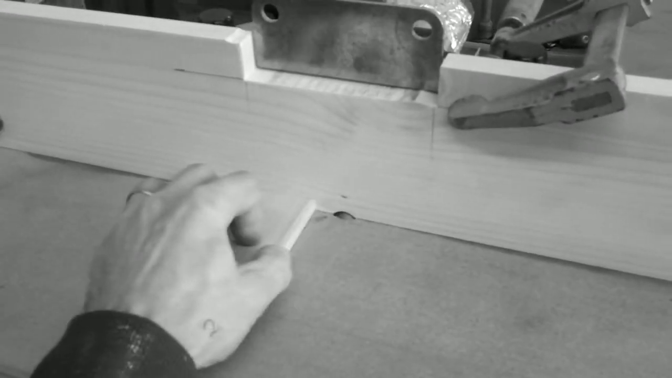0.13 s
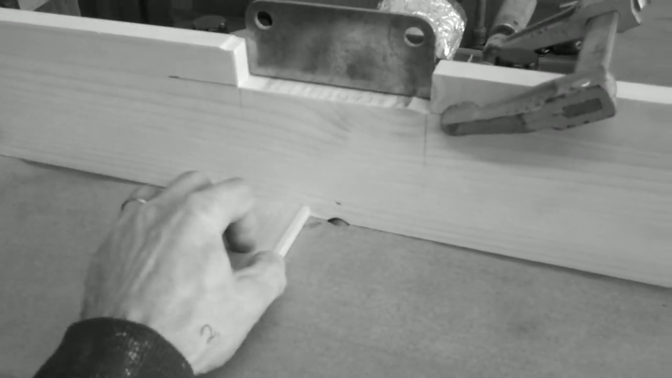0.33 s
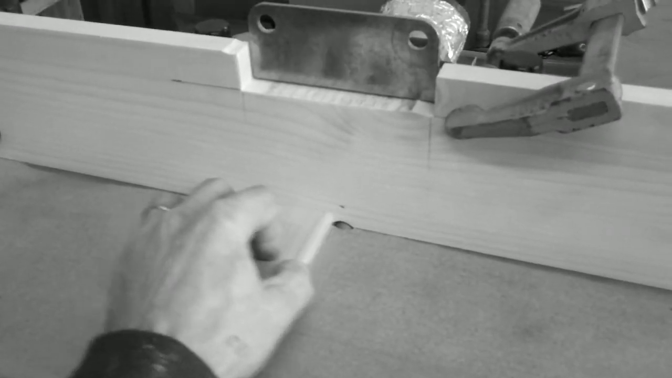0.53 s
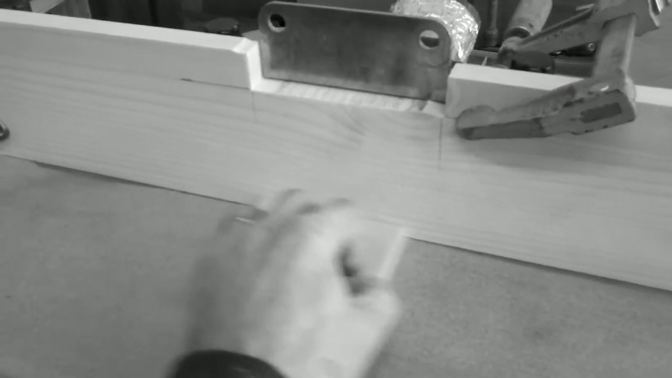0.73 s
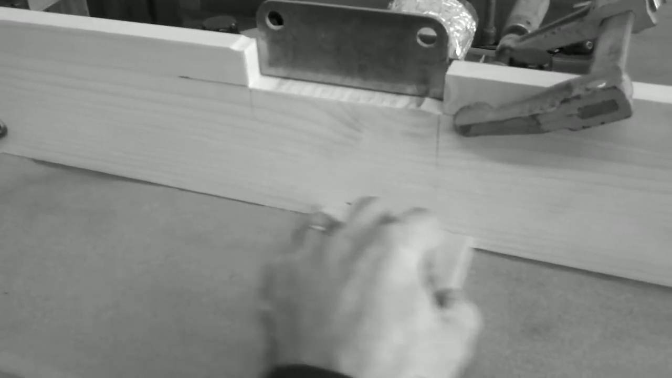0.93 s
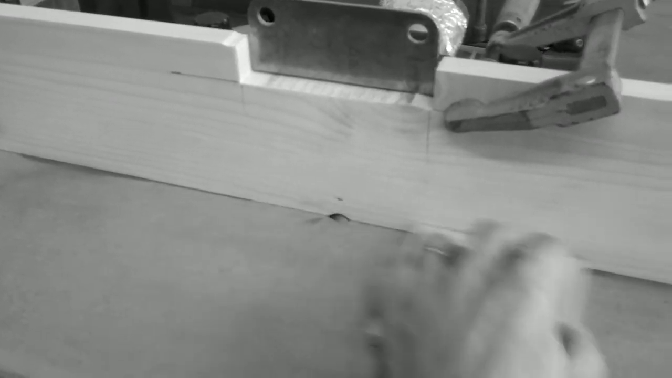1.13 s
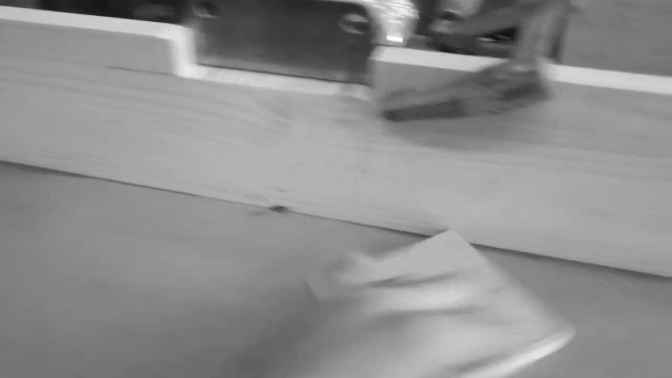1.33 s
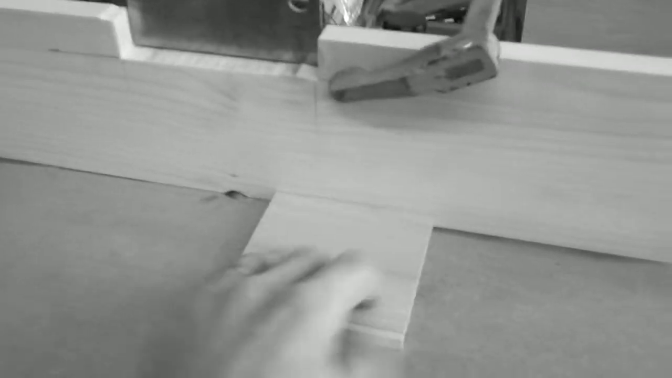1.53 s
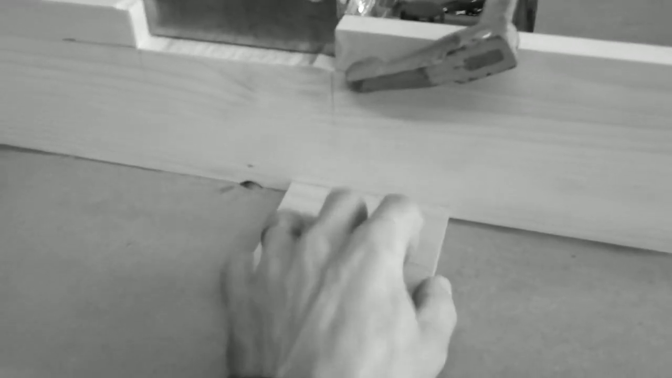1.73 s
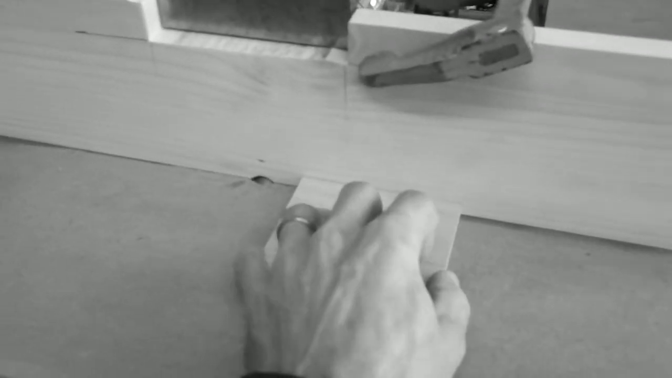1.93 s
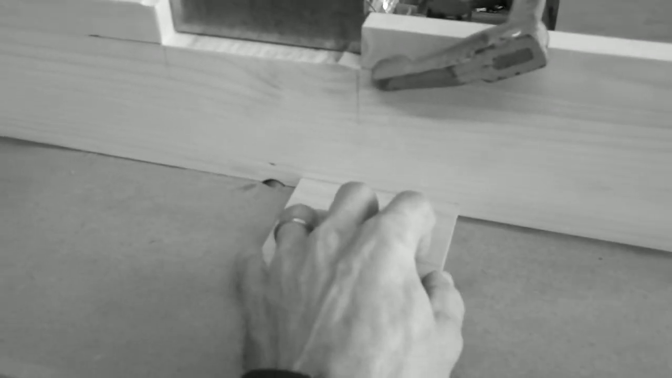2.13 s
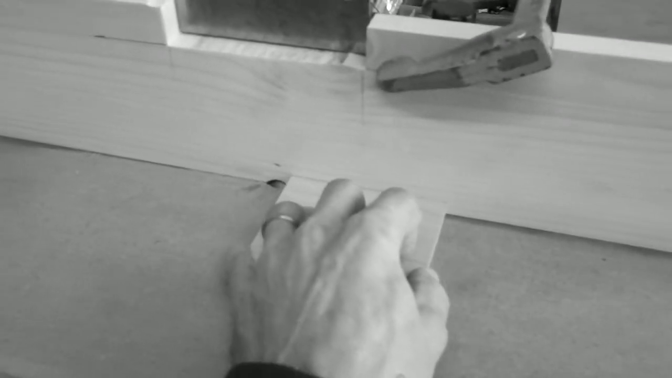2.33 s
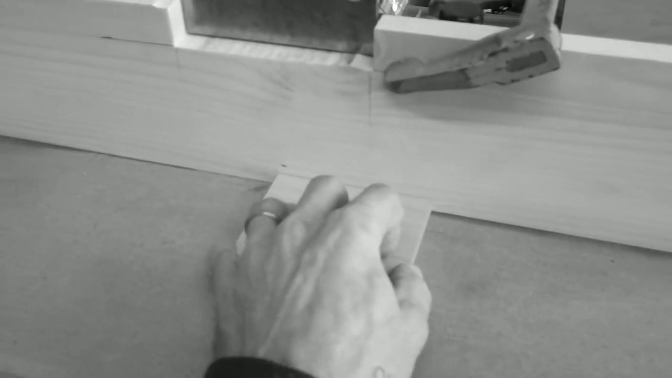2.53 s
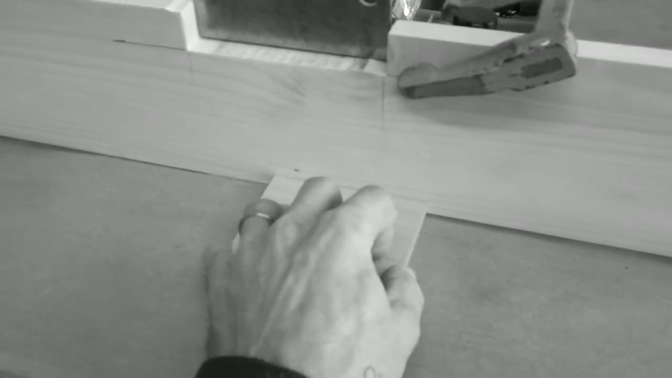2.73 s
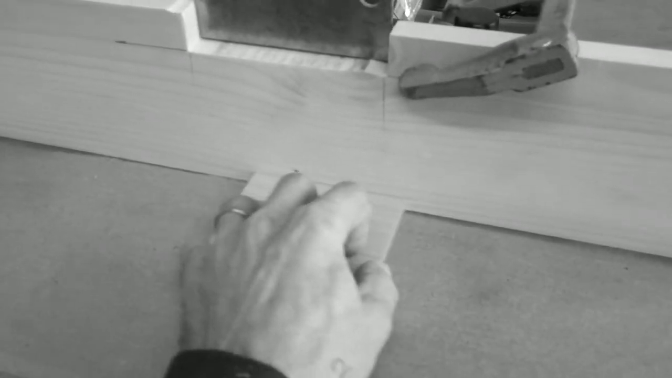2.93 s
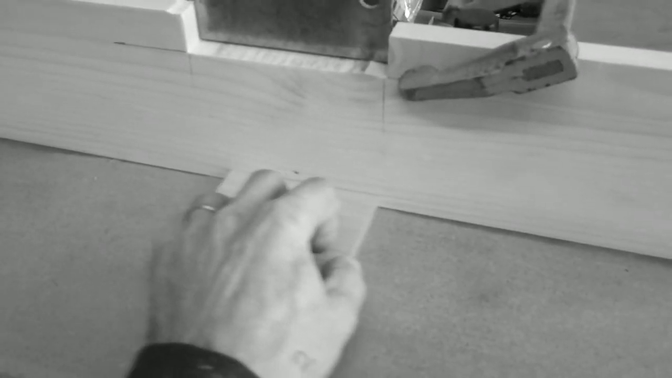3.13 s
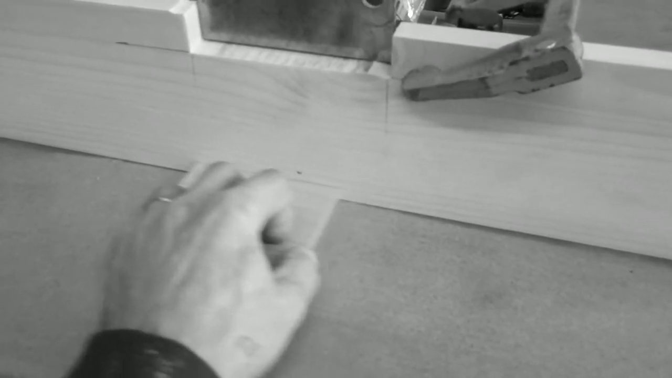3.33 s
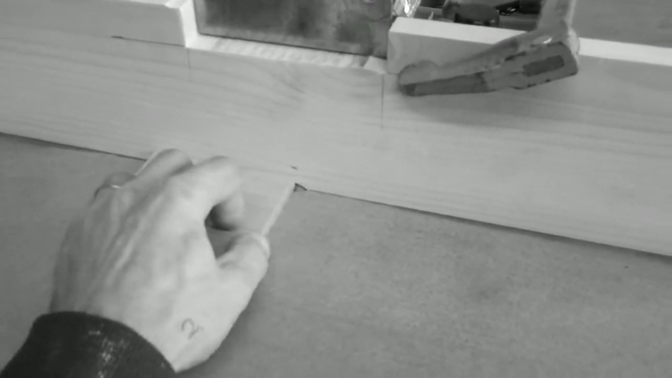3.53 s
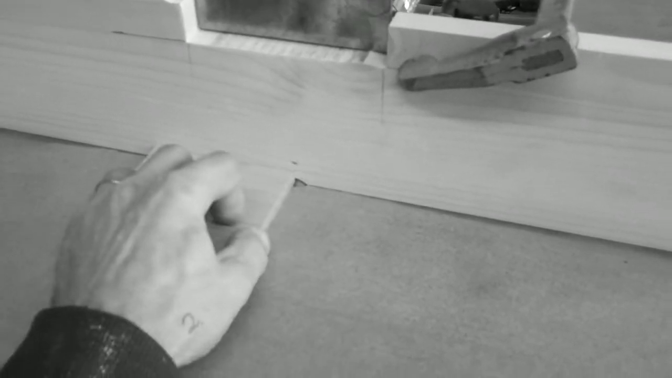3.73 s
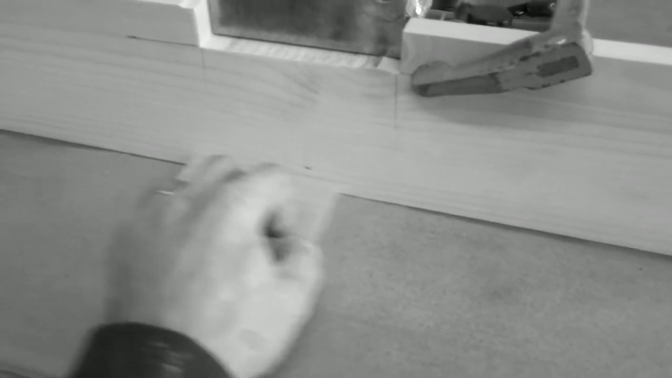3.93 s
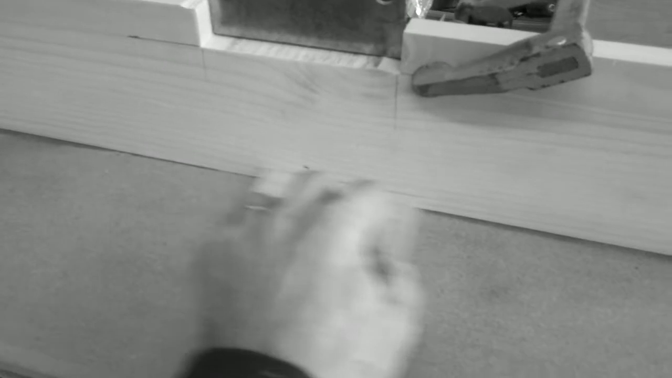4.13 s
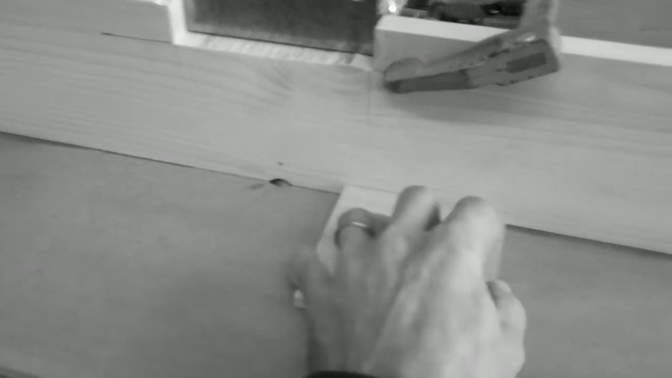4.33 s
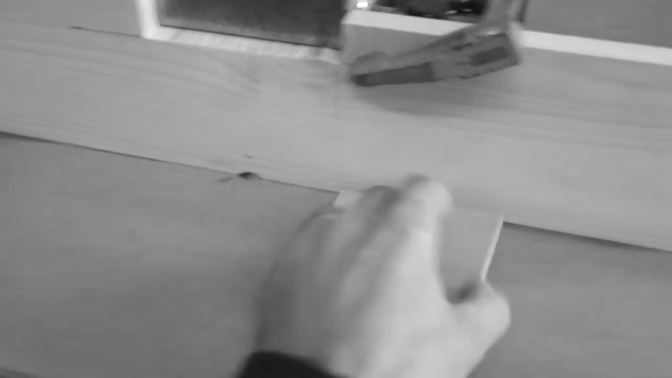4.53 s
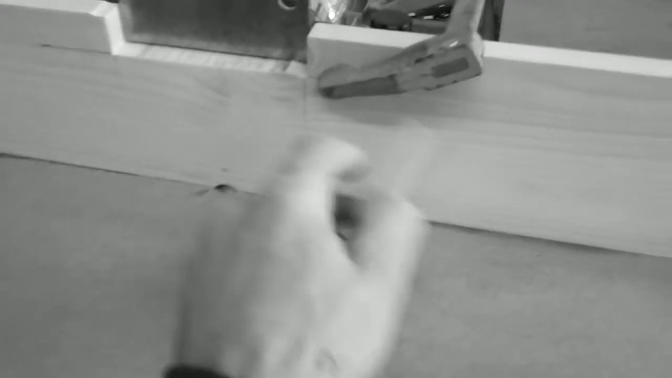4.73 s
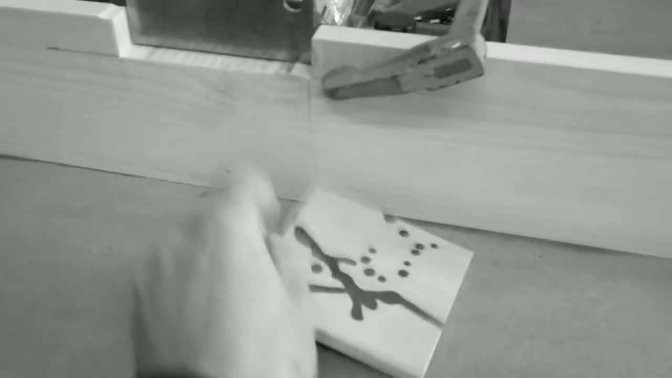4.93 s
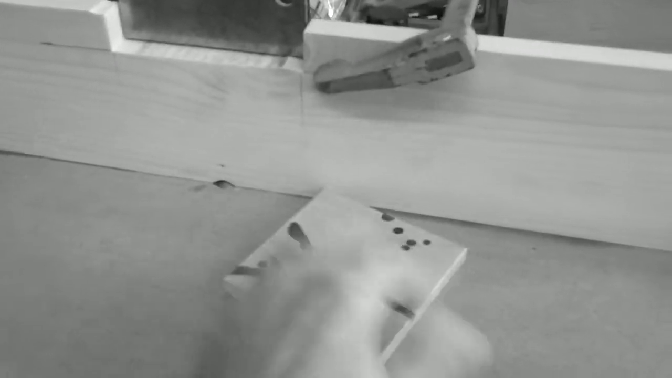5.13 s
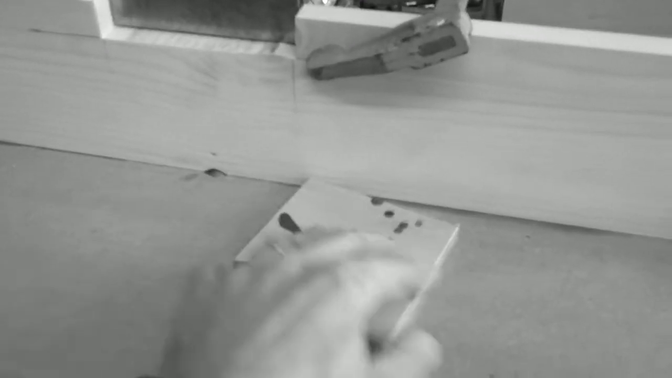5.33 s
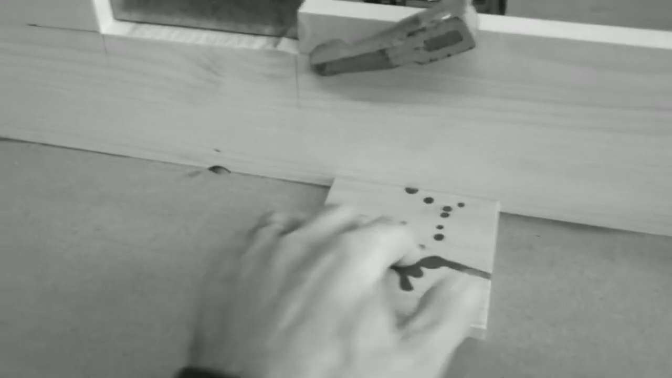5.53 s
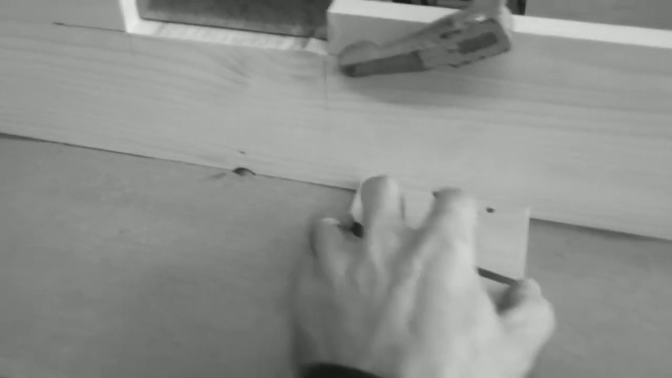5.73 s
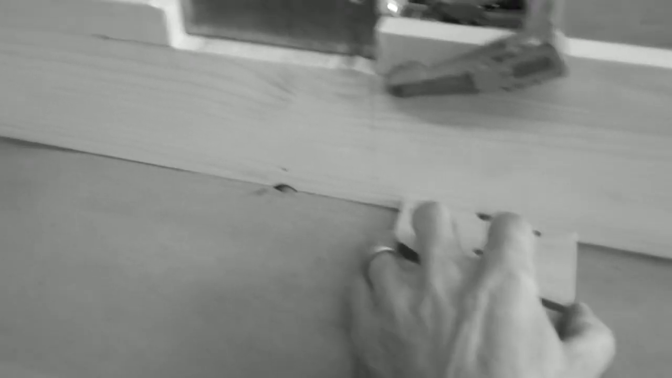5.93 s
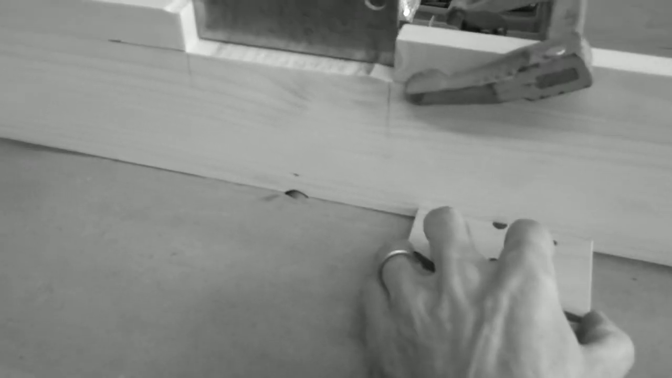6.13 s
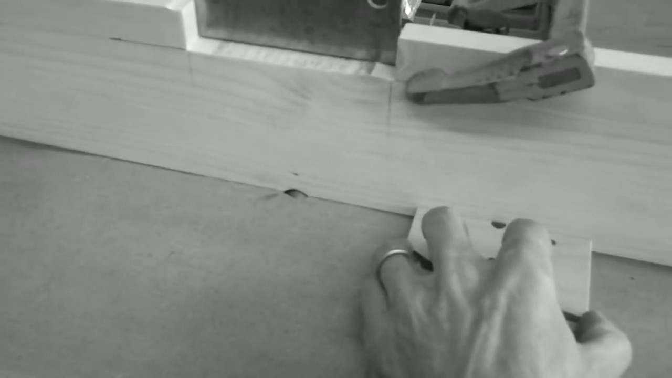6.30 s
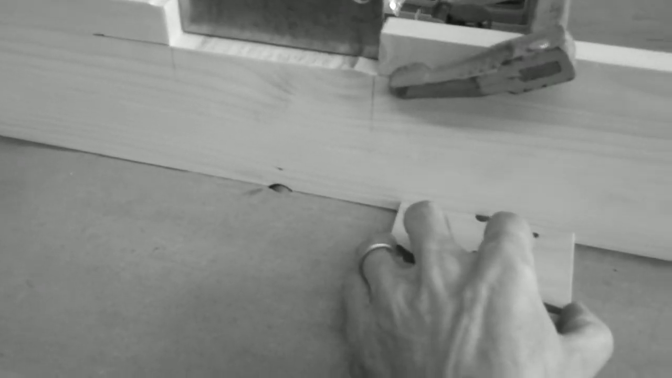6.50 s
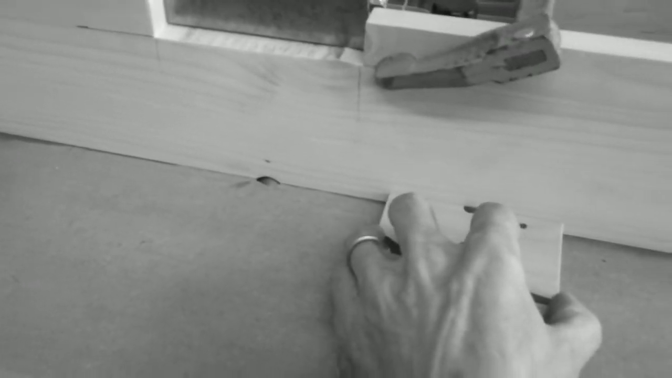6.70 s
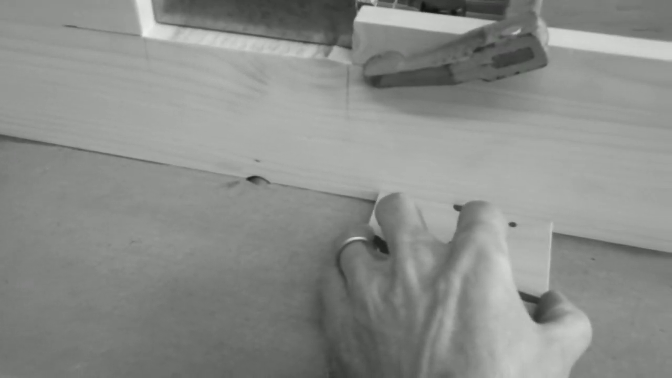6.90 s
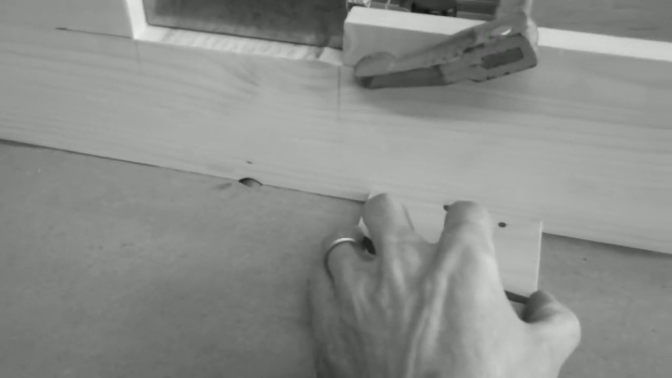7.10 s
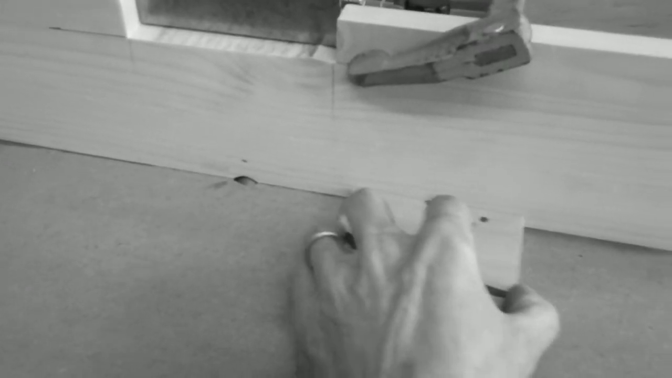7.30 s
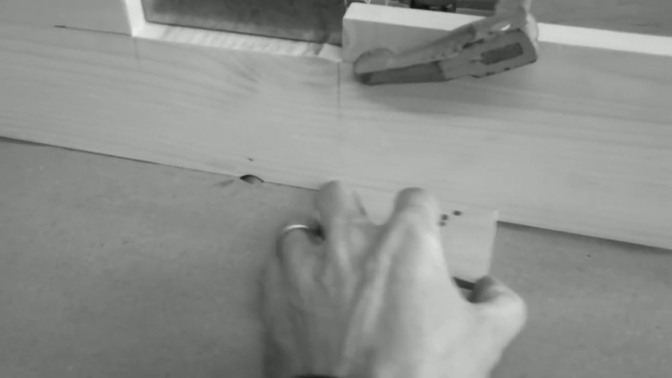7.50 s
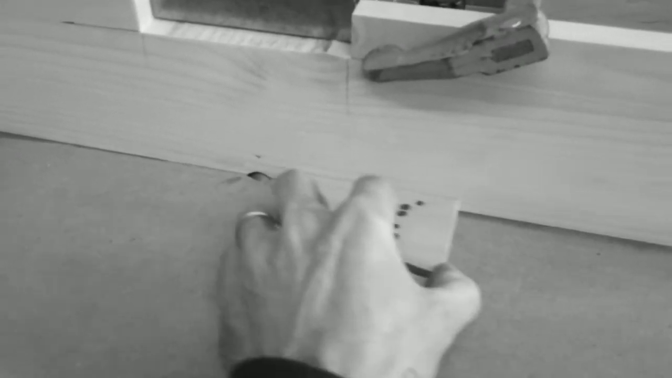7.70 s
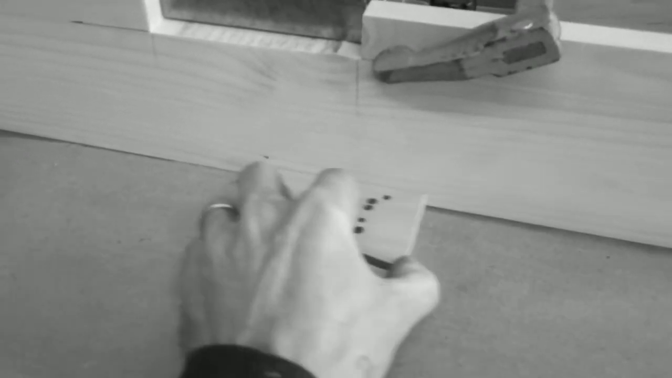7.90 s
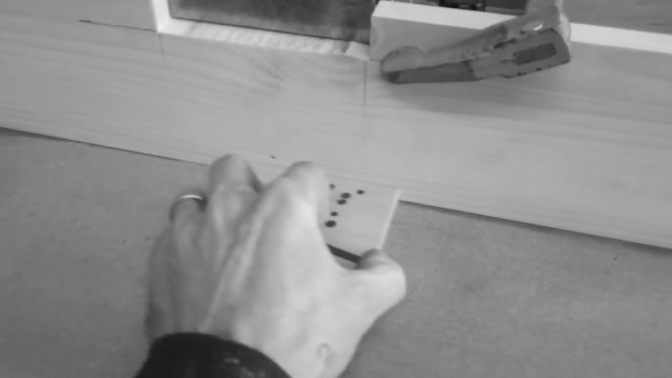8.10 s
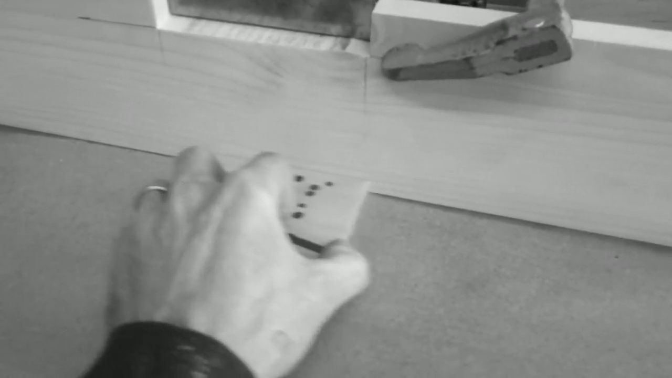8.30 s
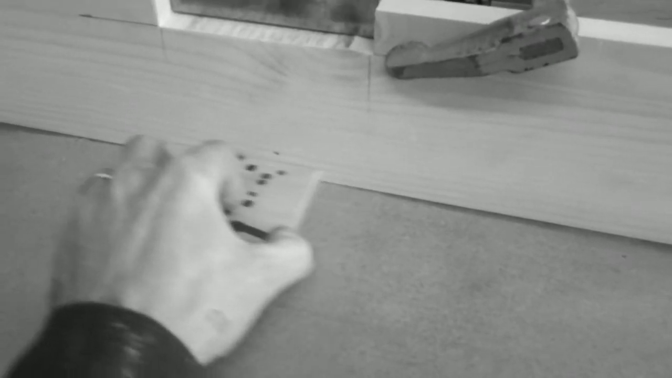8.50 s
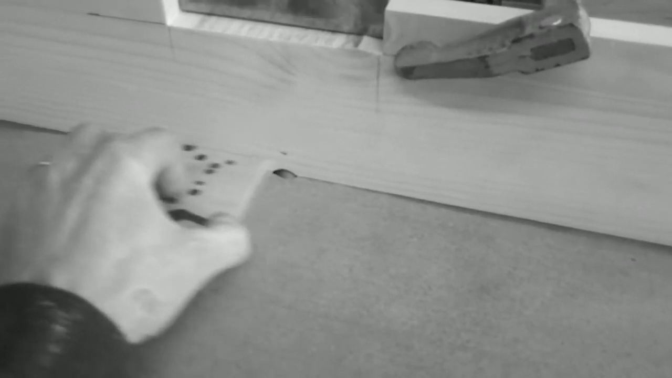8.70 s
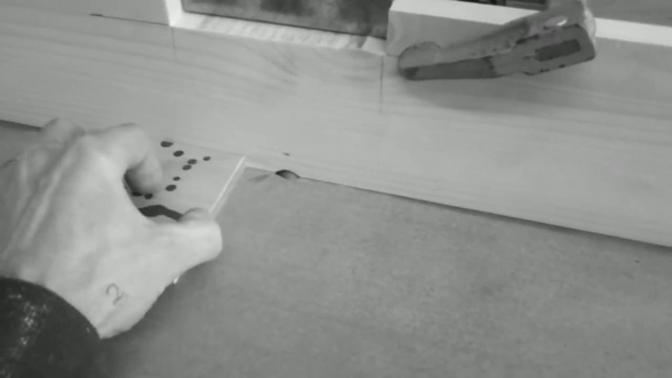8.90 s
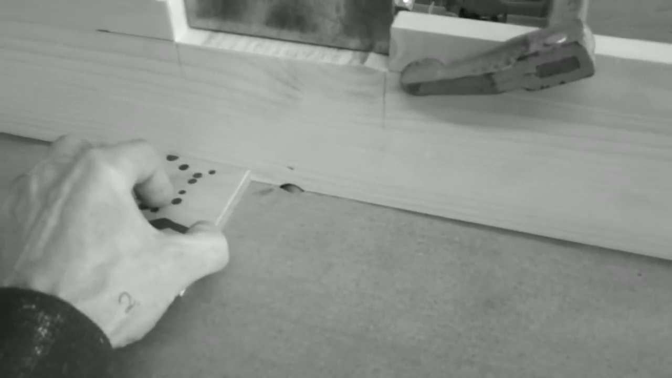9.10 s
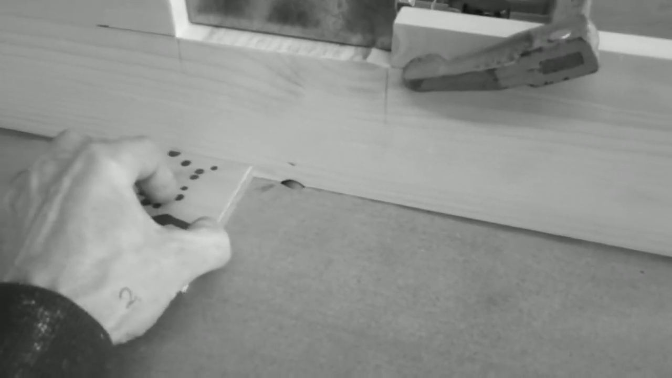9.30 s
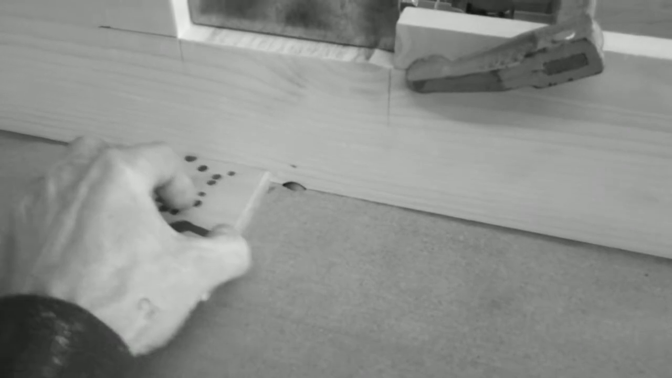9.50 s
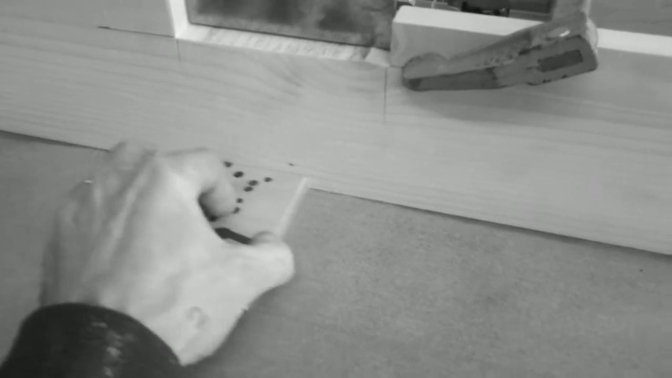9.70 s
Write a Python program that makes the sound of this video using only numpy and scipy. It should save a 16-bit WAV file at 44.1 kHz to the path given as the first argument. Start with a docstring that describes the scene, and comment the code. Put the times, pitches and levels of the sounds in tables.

```python
"""Table router cutting thin wooden tiles

A table router runs at about 207 turns a second in a small workshop while thin wooden tiles are fed along the fence.
Cooling air is shaped noise that rushes; the shaft hums and the bearings whine as tones tied to the spindle.
The two-flute bit buzzes and rasps whenever it bites, and an overtone squeals in the deepest cut.
Between passes a tile is slid, dropped and slapped down: knocks and grit that ring its wooden modes.
Each loud knock ducks the recorder, which recovers slowly."""
import sys
import numpy as np
from scipy import signal
from scipy.fft import rfft, irfft, next_fast_len
from scipy.io import wavfile

SR = 44100
rng = np.random.default_rng(int(sys.argv[2]) if len(sys.argv) > 2 else 0)


def to_wav(s):
    """Save 16-bit WAV."""
    ch = np.atleast_2d(s).T  # columns
    pcm = np.round(np.clip(ch, -1, 1) * 32767)  # PCM
    wavfile.write(sys.argv[1], SR, pcm.astype(np.int16))


N = 429975
TIME = np.arange(N) / SR  # seconds
BINS = np.fft.rfftfreq(2 * next_fast_len(N // 2 + 1, True), 1 / SR)  # Hz
WAVER = 0.09  # unsteadiness of the bit's tones, in size and in phase (radians)

# the strong tones of the cut change balance as the tile moves across:
# multiple [of the turning rate], gained_db [dB from entry to exit]
CUT_SHIFT = [(4, -1), (6, -8.5), (10, 4)]


def gain_of(db):
    """Turns decibels into a gain."""
    return 10 ** (np.asarray(db) / 20)


def evened(x):
    """Scales a sound to an rms of 1."""
    return x / np.sqrt(np.mean(x ** 2) + 1e-20)


def read(points, hz):
    """Reads a spectrum whose points are joined by straight lines on a log pitch axis."""
    point_hz, value = np.transpose(points)
    return np.interp(np.log(hz + 1), np.log(point_hz + 1), value)


def curves(rows):
    """Joins each column of a timed table by straight lines, sample by sample."""
    s, *columns = np.transpose(rows)
    return [np.interp(TIME, s, column) for column in columns]


def add(mix, s, sound):
    """Mixes a sound in at time s."""
    part = mix[round(s * SR):][:len(sound)]
    part += sound[:len(part)]


def drift(rate):
    """Slow random wander around 0, heading for a new value rate times a second."""
    slow = np.interp(TIME[::32] * rate, np.arange(1024), rng.standard_normal(1024))
    return np.repeat(slow.astype(np.float32), 32)[:N]  # held for 32 samples at a time


def coloured(x, db):
    """Filters x by a dB value for each of the BINS."""
    spectrum = rfft(x, 2 * len(BINS) - 2)
    return irfft(spectrum * gain_of(db))[:N]


def line(turns, multiple, waver):
    """One tone of rms about 1, locked to the spindle and wavering in size and phase."""
    cycles = multiple * turns + rng.random()
    within_cycle = (cycles - np.floor(cycles)).astype(np.float32)
    angle = 2 * np.pi * within_cycle + waver * drift(14)
    size = 2 ** 0.5 * (1 + waver * drift(22))
    return size * np.sin(angle)


def resonate(x, hz, width):
    """A resonance that follows the curve hz: shift it down to 0 Hz, smooth, shift back; gain 1."""
    turn = np.exp(2j * np.pi * np.cumsum(hz) / SR)
    r = np.exp(-np.pi * width / SR)
    smoothed = signal.lfilter([1 - r], [1, -r], x / turn)
    return 2 * (turn * smoothed).real


def room(x, near_db=14, near_s=0.0029):
    """Dense reflections: strong early ones off fence and table, then the workshop's short tail."""
    # time for the echoes to die away by 60 dB: pitch_hz [Hz], t60_s [s]
    room_decay = [(200, 0.23), (1200, 0.3), (4000, 0.19), (12000, 0.022)]
    t = np.arange(SR // 2) / SR
    early_boost = 1 + gain_of(near_db) * np.exp(-t / near_s)
    taps = rng.standard_normal(len(t)) * (t > 0.002) * early_boost
    hz, at, z = signal.stft(taps, SR, nperseg=128)
    fade = gain_of(-60 * at / read(room_decay, hz)[:, None])  # each pitch dies at its own pace
    tail = signal.istft(z * fade, SR, nperseg=128)[1]
    return signal.oaconvolve(x, tail / np.linalg.norm(tail))[:N]


def air(turns, level_db=-27, ripple_db=-0.5, throb=0.082, mains=0.07, flutter_db=0.96):
    """Fan noise in the housing, throbbing with each turn and with the mains-fed torque."""
    # basic colour of the rush: pitch_hz [Hz], relative_db [dB per Hz]
    air_colour = [(30, -39), (70, -26.5), (160, -16), (300, -11.5), (450, -6), (900, 0), (1500, 0),
                  (2100, 1.5), (2600, -6), (3300, -9.5), (4300, -22.5), (9300, -21), (11500, -29.5),
                  (15500, -22.5)]
    # cavities of housing and table that colour the air: pitch_hz [Hz], width_hz [Hz], boost_db [dB]
    cavities = [(389, 132, 6.5), (515, 34, -4), (1100, 250, 0), (1250, 33, -7), (6920, 580, 5),
                (9700, 210, 2.5)]
    # slow changes of the rush: time_s [s], change_db [dB]
    air_level = [(0, -1), (.85, 1), (2.1, 0.2), (4.8, 0.8), (7, 0), (9.4, 1.5), (9.75, 0)]

    shape_db = read(air_colour, BINS)
    for hz, width, db in cavities:
        shape_db = shape_db + db / (1 + (2 * (BINS - hz) / width) ** 2)
    # standing waves ripple the spectrum
    standing = np.interp(BINS, np.arange(0, 23000, 28), rng.standard_normal(822))
    torque = np.cos(2 * np.pi * 120 * TIME)
    pulsing = 1 + throb * np.cos(2 * np.pi * turns) + mains * torque
    rush = coloured(rng.standard_normal(N) * pulsing, shape_db + ripple_db * standing)
    loudness_db = level_db + curves(air_level)[0] + flutter_db * drift(25)
    return gain_of(loudness_db) * evened(rush)


def motor(turns, strain, hum_waver=0.033, shaft_waver=0.15, bearing_waver=0.17,
          lines_db=-0.5, shaft_db=-2, whine_db=0.45, loaded_db=-4.5, fizz_db=-54):
    """Shaft and bearing tones, all tied to the spindle, with a thicket of faint high overtones."""
    # tones of the motor; whole multiples are the shaft, the others bearings and their sidebands:
    # multiple [of the turning rate], level_db [dB, before the adjustments below]
    motor_lines = [(1, -32), (2, -34), (3, -46.5), (3.62, -31), (5, -41), (6, -47), (7.24, -35), (8, -42),
                   (8.24, -38), (9, -45), (10, -42), (10.86, -35.5), (12, -42), (14, -50), (14.26, -42),
                   (14.48, -49), (14.84, -40.5), (15, -44), (15.14, -41.5), (15.42, -35), (16, -53),
                   (16.58, -45), (17, -58), (17.15, -49.5), (18, -47), (18.1, -52), (18.32, -61),
                   (32.59, -61), (33.47, -60), (37.87, -57), (40, -59), (43.45, -61), (47.07, -56)]
    # the shaft's hum as hand and microphone move: time_s [s], change_db [dB]
    hum_level = [(0, -1), (.8, 3), (1.6, -1.5), (3.1, 2.5), (3.7, 1), (4.05, 3.5), (4.8, -5), (5.8, .5),
                 (7.5, -1.5), (8.35, 2), (8.85, 0.5), (9.6, 2.5)]
    # the hum's octave: time_s [s], change_db [dB]
    octave_level = [(0, -2.5), (.35, 2.5), (.75, -4), (2.3, -1), (2.85, 3), (3.4, -4.5), (3.75, 1), (4, -6),
                    (4.25, 0.5), (4.55, -3), (8.299, 2.5), (8.8, -0.5), (9.52, 5), (9.68, -9)]
    # the two low bearing tones: time_s [s], change_db [dB]
    low_whine_level = [(0, -6.5), (.4, -4), (1.1, 0), (3.1, -1.5), (4.6, .5), (6.1, .5), (8.4, -.5),
                       (9.6, -2)]

    hum_gains = [gain_of(curves(level)[0]) for level in (hum_level, octave_level)]
    low_whine = gain_of(curves(low_whine_level)[0])
    high_whine = gain_of(whine_db + loaded_db * strain)  # weakens as the cut nears full load
    out = np.zeros(N)
    for multiple, db in motor_lines:
        k = round(multiple)
        if abs(multiple - k) > 0.04:  # a bearing tone
            whine = low_whine if multiple < 8 else high_whine
            tone = whine * line(turns, multiple, bearing_waver)
        else:  # a shaft tone
            shaft_gain = hum_gains[k - 1] if k <= 2 else gain_of(shaft_db)
            tone = shaft_gain * line(turns, k, hum_waver if k == 1 else shaft_waver)
        out += gain_of(db + lines_db) * tone
    high = rng.uniform(32, 70, size=18)
    fizz = sum(line(turns, k, bearing_waver) / float(k) for k in high)
    return out + gain_of(fizz_db) * evened(fizz)


def ring(centre_hz, octaves):
    """The tile's modes, weighted by where and how hard it is struck; peak 1."""
    # modes of a tile on the table: pitch_hz [Hz], relative_db [dB], t60_s [s to fall by 60 dB]
    tile_modes = [(628, 4, 0.0074), (925, 6.5, 0.011), (1293, 4, 0.01), (1712, 3, 0.0096),
                  (2183, 10, 0.0043), (2931, -2.5, 0.018), (3498, -0.5, 0.011), (4380, -8, 0.0081),
                  (5240, -1, 0.0022), (5790, -6.5, 0.012), (6460, -6, 0.0092), (7910, 1.5, 0.0077),
                  (10350, -3.5, 0.0059), (13400, 3, 0.0027)]
    t = np.arange(SR // 10) / SR
    out = np.zeros(len(t))
    for k, (hz, db, t60) in enumerate(tile_modes):
        octaves_off = np.log2(hz / centre_hz)
        weight = 1 / (1 + (octaves_off / octaves) ** 2) ** 2.12
        sign = (-1) ** k  # neighbouring modes start in opposite directions
        out += sign * weight * gain_of(db - 60 * t / t60) * np.sin(2 * np.pi * hz * t)
    return out / abs(out).max()


def tile(wet_db=-12, slide_spread=0.6):
    """Knocks ring the tile and the table under it; sliding excites the tile's modes with fine grit."""
    # modes of the table top under any knock: pitch_hz [Hz], relative_db [dB], t60_s [s to fall by 60 dB]
    table_modes = [(190, -34, 0.021), (426, -35.5, .035), (688, -21.5, 0.027)]
    # knocks and bounces of the tile:
    # start_s [s], level_db [dB, peak of the tile's ring before filter and room], centre_hz [Hz], spread [octaves]
    knocks = [(1.278, -11.5, 1000, 0.88), (1.4591, 9.5, 1330, 1.8), (1.4772, 6.5, 1280, 1.2),
              (4.195, -18.5, 6660, 0.23), (4.618, -17, 980, .6), (4.8828, -4.5, 1500, 0.77),
              (4.9773, 6.5, 5660, 1.85), (5.0114, 9.5, 1900, 0.41), (5.0339, 7.5, 3100, 1),
              (5.0453, 1.5, 5330, 1.1), (5.0564, 2, 3300, 1.1), (5.0795, 2.5, 3920, 1.2),
              (5.103, 4, 3020, 0.69), (5.114, -0.5, 4000, 1), (5.1215, -2, 3450, 1.1),
              (5.151, -7, 1700, 0.53), (5.408, 12, 1250, 1.34), (5.4261, -5, 1170, 0.49),
              (5.4274, 12.5, 1370, 0.88)]
    # the tile rubs over the table:
    # start_s [s], length_s [s], level_db [dB rms before fades, filter and room], centre_hz [Hz]
    slides = [(1.1, .09, -45, 7000), (1.27, 0.05, -45, 1100), (1.32, 0.22, -45, 6540),
              (4.05, 0.2, -44, 7560), (4.176, 0.019, -36, 6500), (4.478, 0.13, -35, 2950),
              (4.847, 0.084, -46, 1400)]

    out = np.zeros(N)
    t = np.arange(SR // 10) / SR
    table = sum(gain_of(db - 60 * t / t60) * np.cos(2 * np.pi * hz * t) for hz, db, t60 in table_modes)
    for s, db, centre_hz, octaves in knocks:
        add(out, s, gain_of(db) * (ring(centre_hz, octaves) + table))
    for s, length, db, centre_hz in slides:
        grit = rng.laplace(size=SR)[:int(length * SR)]
        rub = evened(signal.fftconvolve(grit, ring(centre_hz, slide_spread))[:len(grit)])
        add(out, s, gain_of(db) * rub * signal.windows.tukey(len(rub), 0.7))
    # the knocks carry no deep rumble below about 110 Hz
    highpass = signal.butter(2, 110, "highpass", fs=SR, output="sos")
    out = signal.sosfilt(highpass, out)
    return out + gain_of(wet_db) * room(out)


def feed(release_s=0.028, skew=1.422, mid_pass_hz=6670, entry_db=10, entry_s=0.17, exit_db=10.5, exit_s=0.1):
    """Each pass bites, swells and lets go: gains of the strong tones and the rasp, and the rasp's bright Hz."""
    # passes of wood over the bit, levels before swell, shift and flare:
    # start_s [s], length_s [s], rise_s [s], swell_db [dB at its fullest],
    # fourth_db, sixth_db, tenth_db [dB of the 4th, 6th and 10th multiple], rasp_db [dB],
    # entry_hz, exit_hz [Hz, where the rasp's brightest band is pulled at either corner]
    passes = [(.56, 0.44, 0.19, 7, -48, -41.5, -40, -39.5, 11000, 6560),
              (2.458, 1.077, .03, 4.5, -31.5, -32.5, -29.5, -39, 6140, 8000),
              (3.52, 0.36, .03, 1, -32.5, -44, -42, -56, 7000, 7000),
              (7.87, 0.794, 0.023, 0.5, -32, -33, -28.5, -44, 6100, 7200),
              (9.607, .3, .03, -6, -30, -36, -31, -39.5, 6460, 6900)]
    tones, rasp, bright = np.zeros((len(CUT_SHIFT), N)), np.zeros(N), np.zeros(N)
    for start, length, rise, swell_db, *tones_db, rasp_db, entry_hz, exit_hz in passes:
        t = np.arange(0, length, 1 / SR)
        along = t / length
        bite = np.minimum(t / rise, 1) * np.minimum((length - t) / release_s, 1)
        # a skew above 1 puts the heaviest cutting after the middle of the pass
        swell = swell_db * np.sin(np.pi * along ** skew)
        for tone, db, (_, shift_db) in zip(tones, tones_db, CUT_SHIFT):
            add(tone, start, bite * gain_of(db + swell + shift_db * (along - 0.5)))
        # the rasp flares at the leading and trailing corners, and its brightest band moves with the flare
        entering = np.exp(-t / entry_s)
        leaving = np.exp((t - length) / exit_s)
        add(rasp, start, bite * gain_of(rasp_db + entry_db * entering + exit_db * leaving))
        add(bright, start, (entry_hz - mid_pass_hz) * entering + (exit_hz - mid_pass_hz) * leaving)
    return tones, rasp, mid_pass_hz + bright


def squeal(turns, strain, full_load_db=-27.5, steepness=3.3):
    """The bit's 12th multiple sings out in the deepest cut, growing much faster than the load."""
    return gain_of(full_load_db) * strain ** steepness * line(turns, 12, WAVER)


def cutting(turns, tones, load, rasp_gain, bright_hz, buzz_db=0, peak=2.2, peak_width=1000, echo=0.61,
            weak_flute=0.45, uneven=0.14, chips=0.2):
    """Two flutes, one biting deeper, strike the wood each turn: a low buzz and a rasp of torn chips."""
    # weaker lines of the cut: multiple [of the turning rate], relative_db [dB against the load]
    buzz_lines = [(3, -15), (5, -7), (7, -12), (8, -6), (9, -10), (11, -16), (13, -19), (14, -16), (16, -6),
                  (17, -14), (18, -14)]
    # colour of the rasp of the flutes: pitch_hz [Hz], relative_db [dB per Hz]
    rasp_colour = [(2500, -22), (3900, 0), (4900, -3), (5600, 1.5), (7000, 0), (7800, -3), (9000, -2),
                   (10500, -9), (12000, -13), (15000, -7)]

    strong = sum(tone * line(turns, round(k), WAVER) for tone, (k, _) in zip(tones, CUT_SHIFT))
    weak = sum(float(gain_of(db)) * line(turns, k, WAVER) for k, db in buzz_lines)
    buzz = gain_of(buzz_db) * load * weak

    stroke = np.round(2 * turns).astype(int)  # two strokes a turn
    since = (turns - stroke / 2) / np.gradient(turns)  # samples from the nearest stroke
    unevenness = np.exp(uneven * rng.standard_normal(size=8192))[stroke]
    depth = np.where(stroke % 2, weak_flute, 1) * unevenness
    blows = depth * np.sinc(since) / (1 + (since / 10) ** 2)  # one sharp click per stroke
    near_stroke = 0.18 + np.exp(-abs(since) / (0.00041 * SR))
    spray = depth * rng.standard_normal(N) * near_stroke  # chips fly at each stroke
    rasp = coloured(evened(blows) + chips * evened(spray), read(rasp_colour, BINS))
    rasp = rasp + peak * resonate(rasp, bright_hz, peak_width)
    return strong + buzz + rasp_gain * evened(rasp + echo * room(rasp))


def scene():
    """Everything that turns follows the one spindle; the feed of the wood sets the load."""
    # spindle speed before a small random drift: time_s [s], speed [turns per second]
    spindle_speed = [(0, 207.01), (0.65, 207.53), (1.8, 207.72), (2.5, 207.42), (3.25, 206.21),
                     (3.65, 206.55), (4.2, 207.3), (4.45, 206.57), (4.7, 206.97), (5.6, 207.17),
                     (7.45, 207.57), (7.95, 207.09), (8.7, 206.97), (9.1, 207.37), (9.75, 207.77)]
    tones, rasp_gain, bright_hz = feed()
    load = np.prod(tones, axis=0) ** (1 / len(tones))  # shared level of the strong tones
    strain = load / gain_of(-26.5)  # 1 at full load
    turns = np.cumsum(curves(spindle_speed)[0] + 0.1 * drift(9)) / SR
    running = air(turns) + motor(turns, strain)
    wood = cutting(turns, tones, load, rasp_gain, bright_hz) + squeal(turns, strain)
    return (running + tile() + wood)[None]


def record(dry, limit_db=-3, recovery_db=3.5, start_db=1.5, attack_s=0.0038, ceiling=0.76, edge_hz=15800):
    """Gain control drops at each loud peak and creeps back; what slips through is clipped, then band-limited."""
    over_db = 20 * np.log10(abs(dry[0]) + 1e-9) - limit_db
    fall = recovery_db * TIME  # recovery_db is in dB per second
    # the gain starts start_db down; the running maximum holds each peak while the fall lets it go
    held_db = np.maximum.accumulate(np.maximum(over_db + fall, start_db))
    duck_db = np.maximum(held_db - fall, 0)
    r = np.exp(-1 / (attack_s * SR))
    smooth_db = signal.lfilter([1 - r], [1, -r], duck_db)
    clipped = np.clip(dry * gain_of(-smooth_db), -ceiling, ceiling)
    lowpass = signal.firwin(511, edge_hz, window=("kaiser", 9), fs=SR)
    return signal.oaconvolve(clipped, lowpass[None], "same")


dry = scene()
out = record(dry)
to_wav(out)
```